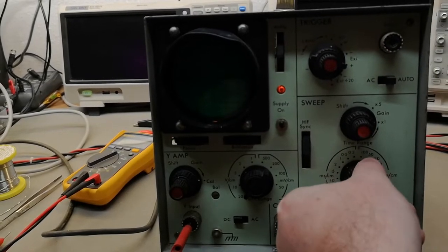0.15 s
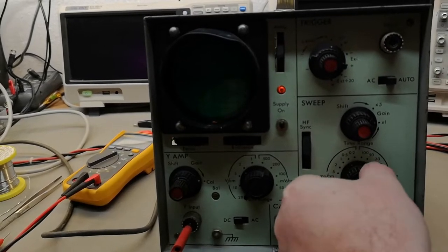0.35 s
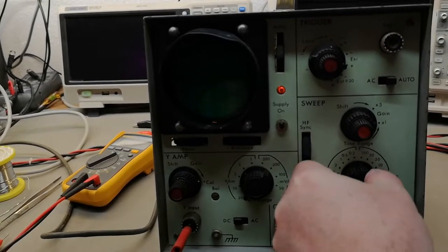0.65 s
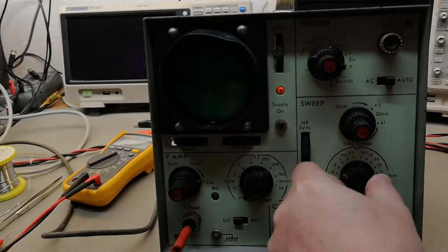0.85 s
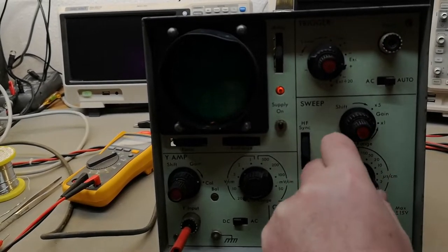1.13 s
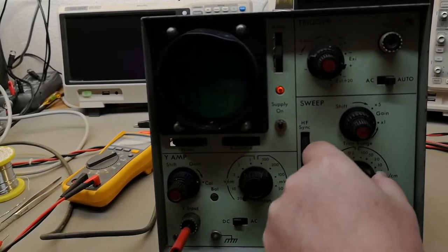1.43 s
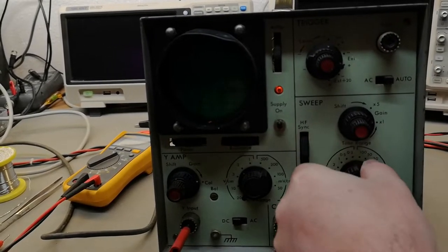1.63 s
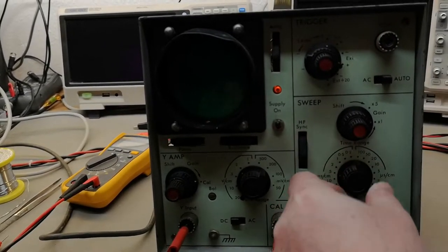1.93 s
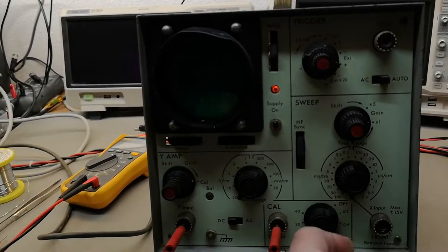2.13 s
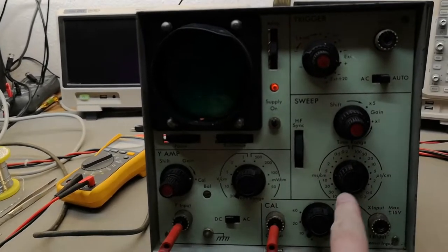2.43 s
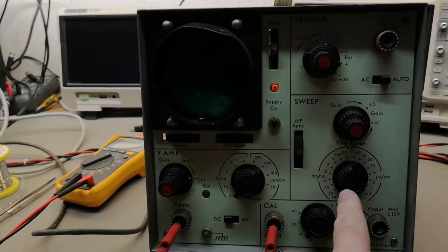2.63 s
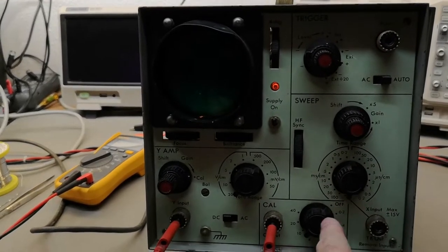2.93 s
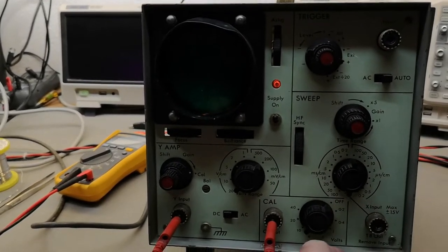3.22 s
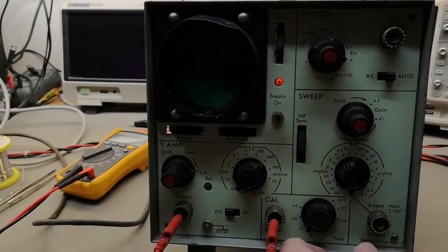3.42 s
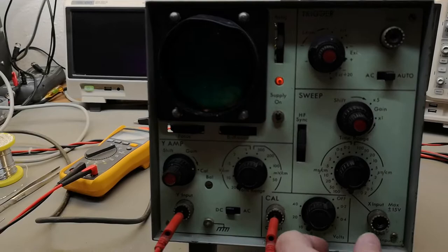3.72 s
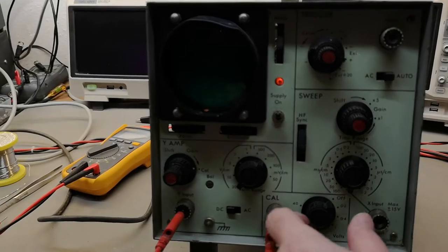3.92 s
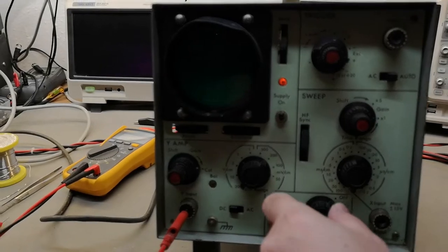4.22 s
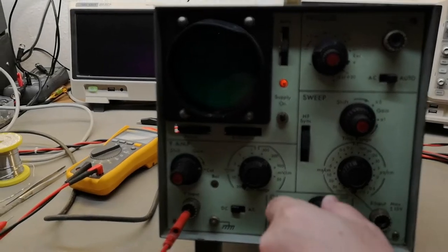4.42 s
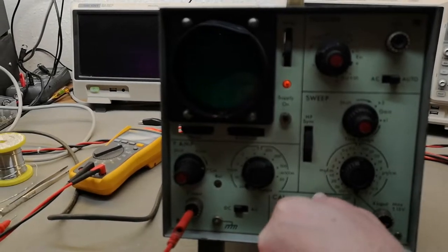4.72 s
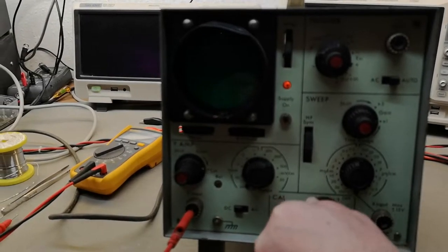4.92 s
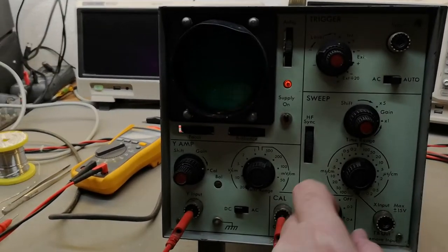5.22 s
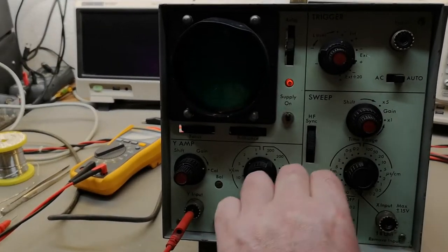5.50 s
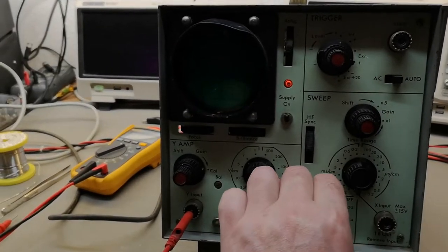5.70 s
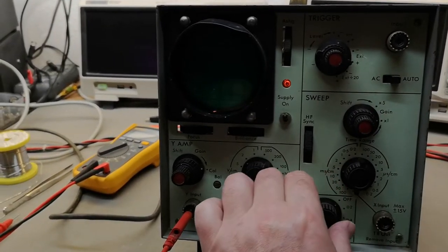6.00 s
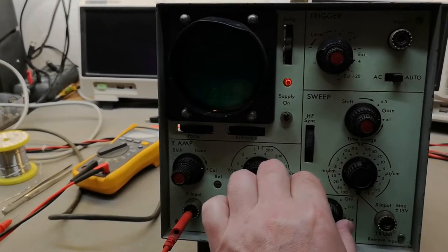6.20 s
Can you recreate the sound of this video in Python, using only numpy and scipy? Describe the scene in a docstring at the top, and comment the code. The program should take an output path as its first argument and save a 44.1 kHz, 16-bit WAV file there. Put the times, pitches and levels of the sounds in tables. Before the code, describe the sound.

A faint mains hum, a thin high electronic whine and low room rumble run throughout. Close by, a rotary switch on an oscilloscope's metal panel is turned step by step: sharp clicks at about 0.2 and 0.6 seconds, a pair near 0.9, then a quick, slightly louder run of five from 1.5 to 1.9 seconds. Each snap carries a brief metallic ring, a soft low thud through the bench and a short small-room reverberation. A pause follows, with a soft finger knock at 2.2 seconds and a faint brush near 3.4. A second switch then gives three heavier, somewhat louder clicks at about 4.5, 4.7 and 5.0 seconds, with a deeper thud under each. Fingers touch and brush the controls lightly around 5.7 and 6.1 seconds, leaving the quiet hum.

```python
"""Rotary switches on an oscilloscope.

Two detented switches on a metal front panel are turned step by step, one after the other.
At each step a sprung detent snaps home: the switch cracks, the case rings and thuds on the bench,
a deep rumble follows and a small room answers. Fingers knock and brush on the controls.
Under it lie room air, mains hum and the thin whine of running electronics."""
import sys
import numpy as np
from scipy import signal
from scipy.fft import rfft, irfft
from scipy.io import wavfile

SR = 44100
rng = np.random.default_rng(int(sys.argv[2]) if len(sys.argv) > 2 else 0)


def store_wav(level_fs):
    """Save 16-bit WAV to argv[1]."""
    pcm = np.round(np.clip(np.atleast_2d(level_fs), -1, 1) * 32767)
    wavfile.write(sys.argv[1], SR, pcm.T.astype(np.int16))


N = 280035

# Detent steps: (time [s], relative level [dB], body below 1400 Hz [dB], ping at 2850 Hz [dB],
# edge above 10 kHz [dB])
SWEEP_STEPS = [(0.2381, -17, -1.5, 2, -1), (0.5579, -14.5, -1, 3, -1.5), (0.856, -12, -1, -1.5, -1.5),
               (0.9217, -14.5, 1.5, 0.5, 3.5), (1.5245, -9, -0.5, 1.5, 2.5),
               (1.6043, -10.5, -1.5, -10, 2.5), (1.6947, -11.5, 1, -1.5, 0), (1.8091, -12, 0, 0.5, 1),
               (1.8770, -10.5, -1, 0.5, -5.5)]
RANGE_STEPS = [(4.5498, -8, -0.5, -1.5, 1), (4.7316, -7.5, -3, 5, 0.89), (4.973, -8, -9.5, -0.5, -0.73)]


def gain_of(db):
    """Decibels to amplitude factor."""
    return 10 ** (np.asarray(db) / 20)


def curve_at(points, hz):
    """Interpolates (frequency [Hz], value) points on a log axis."""
    point_hz, value = np.transpose(points)
    return np.interp(np.log(hz + 1), np.log(point_hz + 1), value)


def unit_energy(x):
    """Scales each channel to energy 1."""
    return x / np.sqrt(np.sum(x ** 2, -1, keepdims=True) + 1e-20)


def decay(t, t60_s):
    """Falls 60 dB in t60_s."""
    return np.exp(-np.log(1000) * t / np.maximum(t60_s, 1e-3))


def add(mix, start_s, sound):
    """Mixes a stereo sound in at start_s."""
    part = mix[:, round(start_s * SR):][:, :sound.shape[1]]
    part += sound[:, :part.shape[1]]


def coloured(x, db_at, size=4096):
    """Minimum-phase filter with gain db_at(hz); attacks stay sharp."""
    hz = abs(np.fft.fftfreq(size, 1 / SR))
    log_gain = np.log(gain_of(db_at(hz)))
    response = np.exp(np.conj(signal.hilbert(log_gain)))
    taps = np.fft.ifft(response).real[:size // 2]
    return signal.fftconvolve(x, taps[None], axes=1)[:, :x.shape[1]]


def noise_pair(size, correlation):
    """Partly correlated stereo white noise."""
    left, other = rng.standard_normal((2, size))
    return np.array([left, correlation * left + np.sqrt(1 - correlation ** 2) * other])


def ring(t, hz, db, t60_s, spread_rad, scatter_db):
    """Decaying modes; each blow shares its force among them differently."""
    count = len(hz)
    phase = 2 * np.pi * rng.random((count, 1)) + spread_rad * rng.standard_normal((2, count, 1))
    amplitude = gain_of(db + scatter_db * rng.standard_normal(count))[:, None]
    return (amplitude * decay(t, t60_s[:, None]) * np.sin(2 * np.pi * hz[:, None] * t + phase)).sum(1)


def room_air(rms_db=-67.7):
    """Low rumble and faint hiss of the room."""
    # Air spectrum: (frequency [Hz], relative density [dB])
    density = [(20, -20), (60, -14), (110, -11), (160, -18), (300, -20), (420, -32), (650, -37.5),
               (1900, -31), (4500, -40.5), (6200, -41.5), (8000, -39), (12000, -46.5), (16000, -46)]
    # Left-right likeness: (frequency [Hz], correlation [0..1])
    likeness = [(60, 1), (180, 0.56), (550, 0.52), (1650, 0.4), (4970, 1), (15000, 0.16)]
    hz = np.fft.rfftfreq(N, 1 / SR)
    left, other = rfft(rng.standard_normal((2, N)))
    correlation = np.clip(curve_at(likeness, hz), -1, 1)
    right = correlation * left + np.sqrt(1 - correlation ** 2) * other
    spectrum = np.array([left, right]) * gain_of(curve_at(density, hz))
    return gain_of(rms_db) * np.sqrt(N) * unit_energy(irfft(spectrum, N))


def hum(knots=24, waver_db=1.93):
    """Mains hum and electronic whine, wavering in pitch and level."""
    # Tones: (frequency [Hz], rms level [dB], wander [Hz], right-channel lag [rad])
    tones = [(101.6, -69, 4.2, .1), (303, -82.5, 0.28, .3), (5314, -78, 2.5, 0.93), (10644, -82, 5.8, 0.51)]
    out = np.zeros((2, N))
    position = np.linspace(0, knots - 1, N)
    for hz, db, wander_hz, lag_rad in tones:
        drift, swell = (np.interp(position, np.arange(knots), v) for v in rng.standard_normal((2, knots)))
        phase = 2 * np.pi * np.cumsum(hz + wander_hz * drift) / SR
        out += gain_of(db + waver_db * swell) * np.sqrt(2) * np.sin([phase, phase - lag_rad])
    return out


def rumble(rest_db=-62.5, shake_db=-40, shake_peak_s=0.082, swell_s=0.15):
    """Deep mono rumble; swells after each step and briefly at four other moments."""
    # Rumble spectrum: (frequency [Hz], relative density [dB])
    density = [(8, -2), (22, 1.5), (40, -4.5), (60, -18.5), (120, -24.5), (300, -55.5), (1000, -89)]
    # Extra swells: (time [s], rms level at the top [dB])
    swells = [(1.0, -49), (2.25, -50.5), (3.27, -50.5), (5.698, -51.5)]
    t = np.arange(N) / SR
    power = np.full(N, gain_of(rest_db) ** 2)
    for step_s, db, *_ in SWEEP_STEPS + RANGE_STEPS:
        age = np.maximum(t - step_s, 0) / shake_peak_s
        power += (gain_of(db + shake_db) * age * np.exp(1 - age)) ** 2
    for peak_s, db in swells:
        power += gain_of(db) ** 2 * np.exp(-(2 * (t - peak_s) / swell_s) ** 2)
    shape = gain_of(curve_at(density, np.fft.rfftfreq(N, 1 / SR)))
    noise = irfft(rfft(rng.standard_normal(N)) * shape, N)
    return np.sqrt(power * N) * unit_energy(noise)


def room_reverb(x, build_s=0.0036):
    """Diffuse tail; sound leaving the panel to either side takes its own paths."""
    # Room decay: (frequency [Hz], t60 [s])
    decay_times = [(200, .42), (800, .37), (2500, .32), (7000, .29), (14000, .25)]
    # Tail colour: (frequency [Hz], level [dB])
    levels = [(200, 4), (800, -3.5), (1400, -5.5), (2500, -3.5), (5000, -6), (9000, -6.5), (14000, -12)]
    out = np.zeros((2, N))
    for side in x:
        hz, t, noise = signal.stft(noise_pair(SR * 3 // 4, correlation=0.3), SR, nperseg=256)
        envelope = decay(t, curve_at(decay_times, hz)[:, None]) * (1 - np.exp(-(t / build_s) ** 2))
        envelope = unit_energy(envelope) * gain_of(curve_at(levels, hz))[:, None]
        tail = signal.istft(noise * envelope, SR, nperseg=256)[1] / np.sqrt(128)
        out += signal.fftconvolve(side[None], tail, axes=1)[:, :N]
    return out


def near_echoes(x, left_s=0.0029, left_db=-5, right_s=0.0043, right_db=-10):
    """Early reflections off the bench top and the hand."""
    out = x.copy()
    add(out, left_s, x * gain_of(left_db) * np.array([[1], [0]]))
    add(out, right_s, x * gain_of(right_db) * np.array([[0], [1]]))
    return out


def mic_ports(x):
    """Two ports face the panel differently; each colours the direct sound."""
    # Port responses, left then right: (frequency [Hz], gain [dB])
    ports = [
        [(500, -2.5), (1200, 5), (1900, 2.5), (3500, -0.5), (6000, 5.5), (9000, -2), (11500, -8.5),
         (15000, -9.5)],
        [(500, -5.5), (1000, 2), (1900, 2.5), (3500, 11.5), (6000, 2), (9000, 8), (11500, 6.5), (15000, -2.5)],
    ]
    return np.vstack([coloured(side[None], lambda f: curve_at(port, f)) for side, port in zip(x, ports)])


def finger_touches():
    """Soft knocks and brushes on knobs and panel."""
    # Touches: (time [s], relative level [dB], band centre [Hz], t60 [s])
    touches = [(0.761, -72, 1400, 0.023), (2.17, -57, 900, 0.021), (3.379, -68, 6600, 0.17),
               (4.881, -58, 990, 0.014), (4.940, -61, 897, 0.033), (5.681, -67.5, 2300, 0.017),
               (6.117, -61, 1510, 0.075), (6.125, -63, 6750, 0.23)]
    out = np.zeros((2, N))
    t = np.arange(SR // 4) / SR
    for start_s, db, hz, t60_s in touches:
        burst = noise_pair(len(t), correlation=0.51) * decay(t, t60_s) * (1 - decay(t, t60_s / 2))
        knock = coloured(burst, lambda f: -34 * np.log10(1 + np.log2((f + 40) / hz) ** 2))
        add(out, start_s, gain_of(db + 23) * unit_energy(knock))
    return out


def bench_thud(t, rise_s=0.017):
    """The whole instrument rocks on the bench."""
    # Rocking modes: (frequency [Hz], relative level [dB], t60 [s])
    modes = [(35, -12.5, 0.77), (83.8, -1, 0.22), (100.2, -2.5, 0.44), (113.63, -5.5, 0.46),
             (158, -14, 0.17)]
    rocking = ring(t, *np.transpose(modes), spread_rad=0.03, scatter_db=-1.0)
    return rocking * (1 - np.exp(-(t / rise_s) ** 2))


def case_ring(t, modes, step_db, free_db=-17.5, halving_db=11, rise_s=0.0023):
    """Sheet metal rings; a harder step means a firmer grip and a shorter decay."""
    hz, db, free_t60_s = np.transpose(modes)
    t60_s = free_t60_s * 0.5 ** ((step_db - free_db) / halving_db)
    return ring(t, hz, db, t60_s, spread_rad=0.16, scatter_db=4.5) * (1 - np.exp(-t / rise_s))


def detent_slide(colour, length_s=0.008, swell_s=0.002):
    """The detent scrapes ever faster down the flank of its notch."""
    t = np.arange(round(length_s * SR)) / SR
    scrape = coloured(noise_pair(len(t), correlation=0.6), lambda f: curve_at(colour, f))
    return unit_energy(scrape * np.exp(t / swell_s))


def detent_snap(t, colour, metal, t60_s, metal_db, impact_db, rise_s=0.00093, impact_s=0.0018):
    """The detent lands: first contact, a dense rattle and a short ring of metal parts."""
    grain = np.tanh(noise_pair(len(t), correlation=0.33))
    force = decay(t, t60_s) + gain_of(impact_db) * np.exp(-(t / impact_s) ** 2)
    crack = unit_energy(coloured(grain * force, lambda f: curve_at(colour, f)))
    hz, width_hz, db = np.transpose(metal)
    metal_t60_s = np.log(1000) / np.pi / (width_hz + 30)  # finger damping adds 30 Hz
    tone = ring(t, hz, db, metal_t60_s, spread_rad=1.09, scatter_db=-0.5)
    return (crack + gain_of(metal_db) * unit_energy(tone)) * (1 - np.exp(-t / rise_s))


def turn_switch(steps, colour, metal, case, crack_db, crack_t60_s, impact_db, metal_db,
                slide_db, case_db, thud_db, pan_db=-1.5):
    """Slide, snap, ring and thud at each step; returns (cracks, ringing of case and bench)."""
    cracks, rings = np.zeros((2, 2, N))
    t = np.arange(SR * 3 // 4) / SR
    pan = gain_of([[pan_db / 2], [-pan_db / 2]])
    for step_s, db, body_db, ping_db, edge_db in steps:
        gain = gain_of(db + crack_db) * pan
        scrape = gain_of(slide_db) * detent_slide(colour)
        add(cracks, step_s - scrape.shape[1] / SR, gain * scrape)
        tilt = [(1400, body_db), (2200, 0), (2850, ping_db), (3600, 0), (6000, 0), (10000, edge_db)]
        snap = detent_snap(t, colour, metal, crack_t60_s, metal_db, impact_db)
        add(cracks, step_s, gain * coloured(snap, lambda f: curve_at(tilt, f)))
        add(rings, step_s, gain_of(case_db) * case_ring(t, case, db))
        add(rings, step_s, gain_of(thud_db) * bench_thud(t))
    return cracks, rings


def range_switch():
    """Three detent steps with a heavier thud."""
    # Crack spectrum: (frequency [Hz], relative density [dB])
    colour = [(120, -68.5), (200, -20), (558, -25.5), (1230, -5.5), (1530, -8.5), (2170, -7), (2750, -3),
              (3190, -6), (3830, -2), (4200, -8), (7410, 2), (9060, -7.5), (13300, -20), (15100, -17),
              (16000, -47)]
    # Spring, shaft and wafer modes: (frequency [Hz], free width [Hz], relative level [dB])
    metal = [(2901, 49, 6), (3000, 62, -2), (3470, 160, -24), (4810, 200, 5.5), (5290, 24, 9.5),
             (6200, 150, -9.5), (6680, 44, -13.5), (6860, 130, 1.5), (7410, 370, 3.5), (8300, 130, -9),
             (8900, 180, 13), (9440, 59, -8.5), (11700, 56.7, -8), (10400, 150, -7)]
    # Case modes: (frequency [Hz], relative level [dB], free t60 [s])
    case = [(970, -43, 0.26), (1328, -37.5, 0.092), (1765, -12.5, 0.12), (1930, -34.5, 1),
            (2470, -39.5, 0.23), (2565, -25.5, 0.22), (2960, -24.5, 0.17), (4170, -37.5, .2)]
    return turn_switch(RANGE_STEPS, colour, metal, case, crack_db=12.5, crack_t60_s=0.036,
                       impact_db=-3, metal_db=-11, slide_db=-31.5, case_db=-25.5, thud_db=-36.0)


def sweep_switch():
    """Nine detent steps with a sharp first contact."""
    # Crack spectrum: (frequency [Hz], relative density [dB])
    colour = [(120, -49), (200, -23.5), (456, -23), (623, -16), (1230, -13.5), (2210, -14.5), (3020, -7.5),
              (3760, -8.5), (4120, -13.5), (5040, -6), (6880, -6), (7540, -3.5), (11100, -15.5),
              (15100, -31.5), (16000, -46.5)]
    # Spring, shaft and wafer modes: (frequency [Hz], free width [Hz], relative level [dB])
    metal = [(3190, 360, 5), (4070, 340, -3), (5470, 110, 0), (5320, 23, -6), (5710, 12, -3),
             (6520, 66, 1.5), (6920, 290, -6.5), (7390, 100, 11.5), (7360, 45, -5.5), (8050, 41, -3.5),
             (8540, 170, -8), (9300, 73, -7.5), (9600, 170, -4), (9560, 35, -2)]
    # Case modes: (frequency [Hz], relative level [dB], free t60 [s])
    case = [(181, -36, 0.12), (252.5, -36, 0.084), (432, -43.5, 0.05), (553, -41, .15), (607, -32.5, 0.12),
            (877, -25, 0.45), (1230, -29.5, 0.13), (1762, -31.5, 0.3), (2540, -33.5, 0.4),
            (2745, -36.5, 0.32)]
    return turn_switch(SWEEP_STEPS, colour, metal, case, crack_db=14.5, crack_t60_s=0.029,
                       impact_db=3.5, metal_db=-13.5, slide_db=-21, case_db=-18.5, thud_db=-44.5)


def scene():
    """Sweep switch, then range switch, over air, hum and rumble."""
    sweep_cracks, sweep_rings = sweep_switch()
    range_cracks, range_rings = range_switch()
    direct = sweep_cracks + range_cracks + finger_touches()
    clicks = mic_ports(near_echoes(direct)) + room_reverb(direct)
    return clicks + sweep_rings + range_rings + room_air() + hum() + rumble()


def record(dry):
    """Low-pass band limit."""
    edge_hz = 15900
    taps = signal.firwin(255, edge_hz, window=("kaiser", 8), fs=SR)
    return signal.oaconvolve(dry, taps[None], "same")


dry = scene()
out = record(dry)
store_wav(out)
```